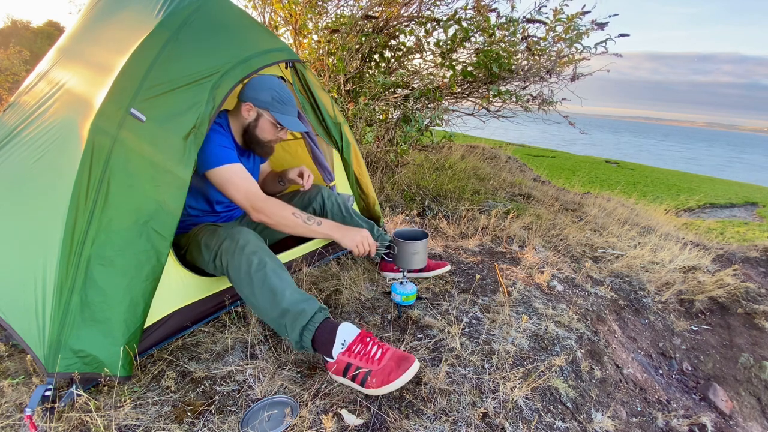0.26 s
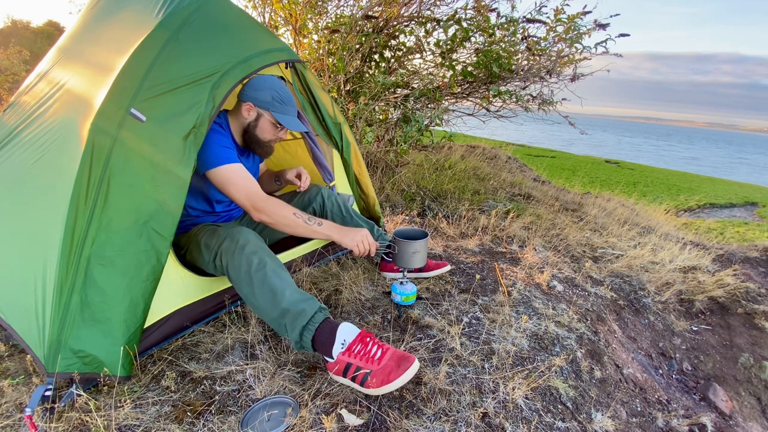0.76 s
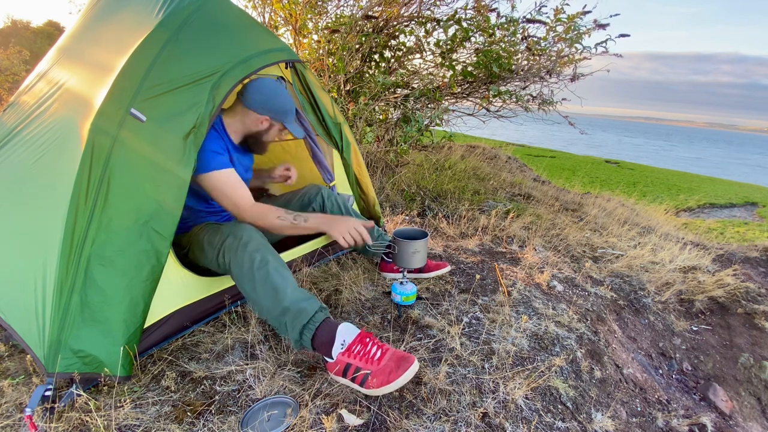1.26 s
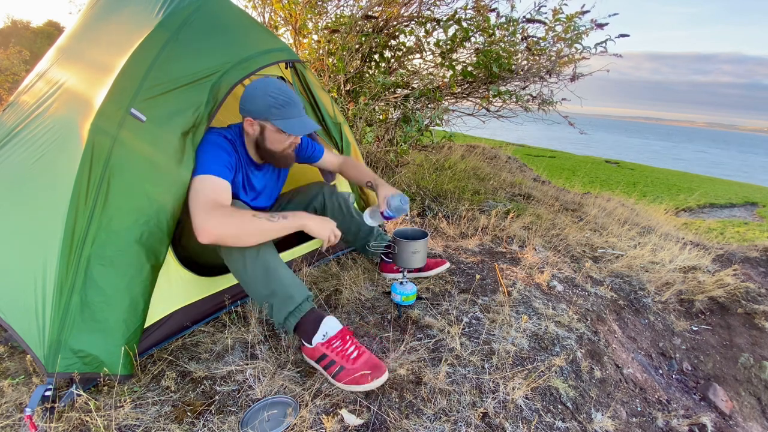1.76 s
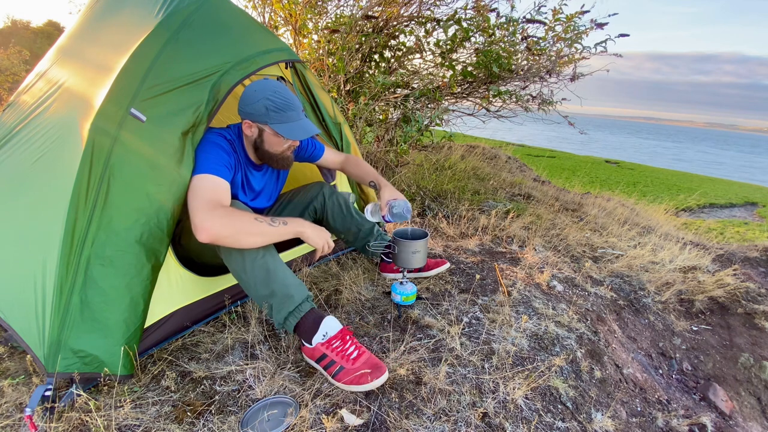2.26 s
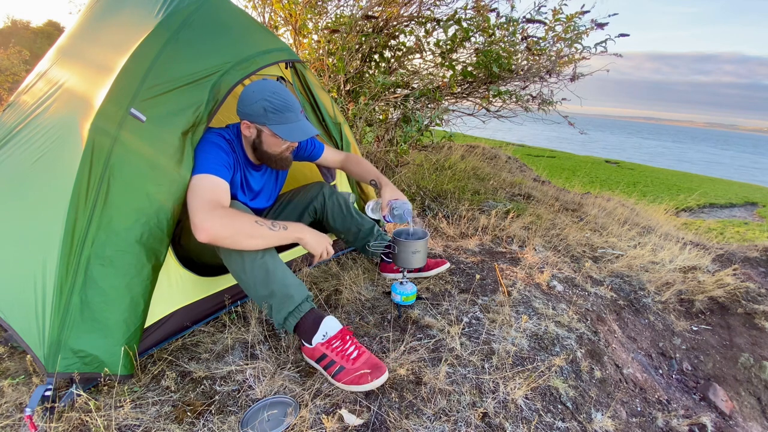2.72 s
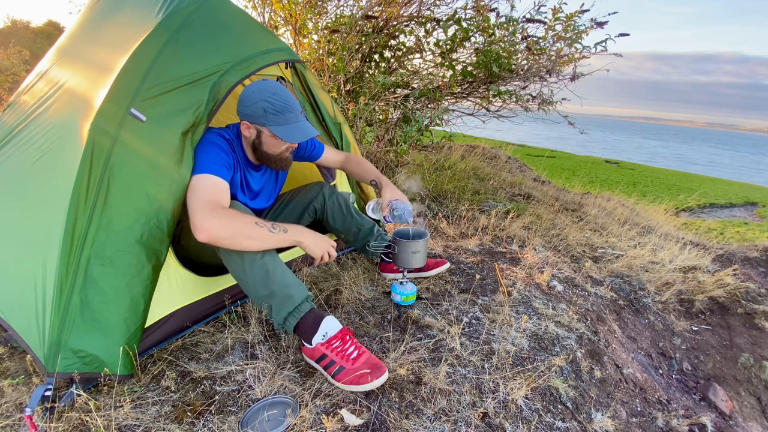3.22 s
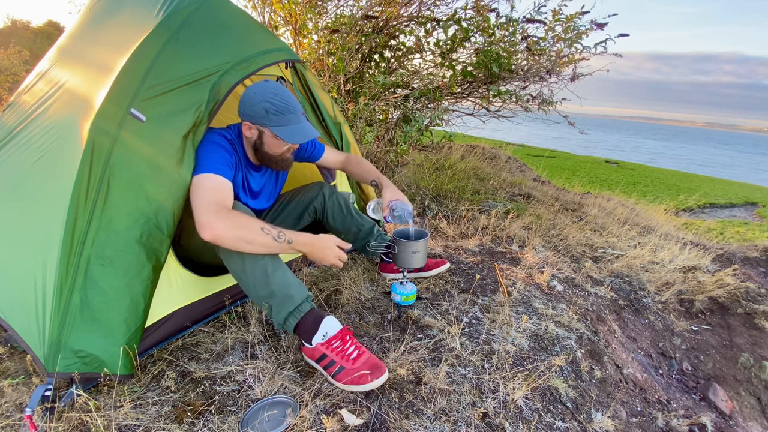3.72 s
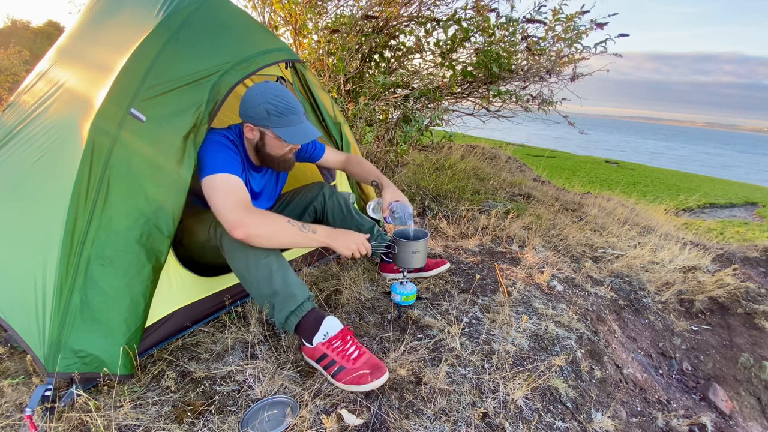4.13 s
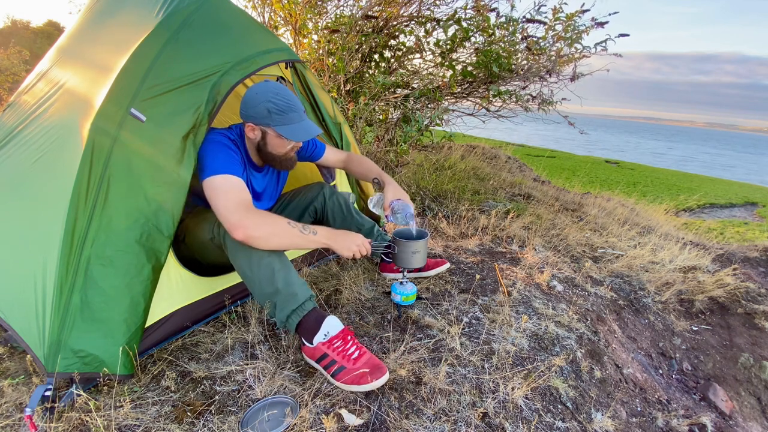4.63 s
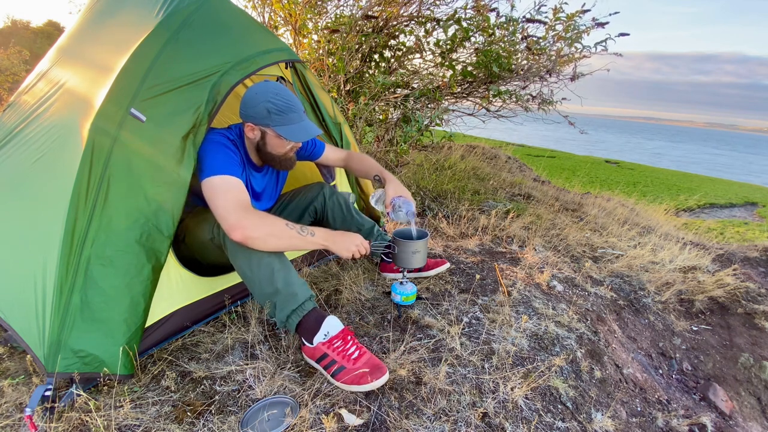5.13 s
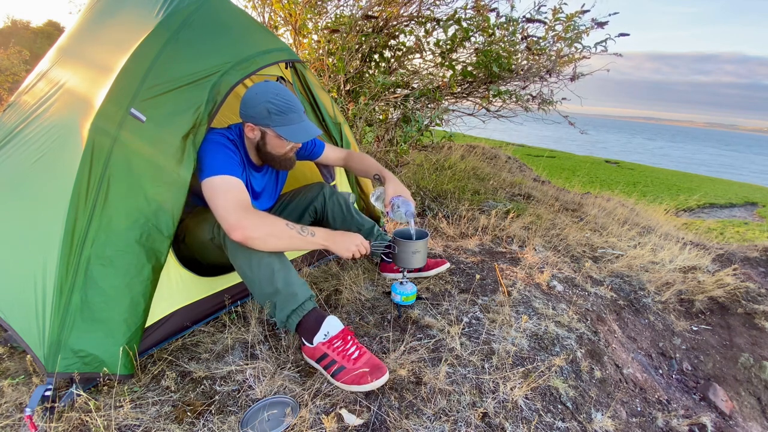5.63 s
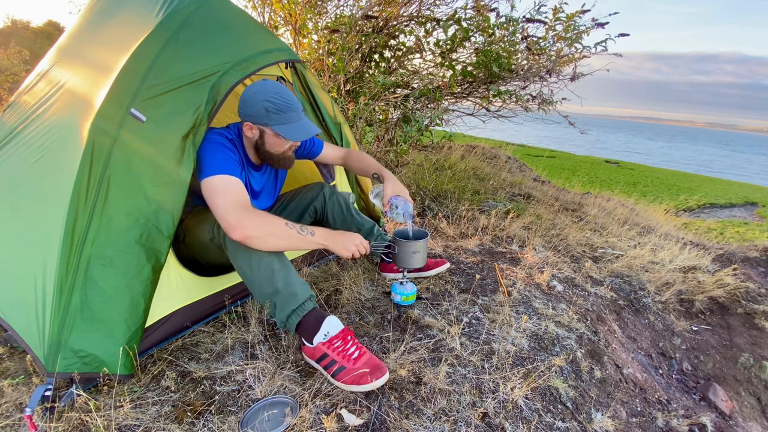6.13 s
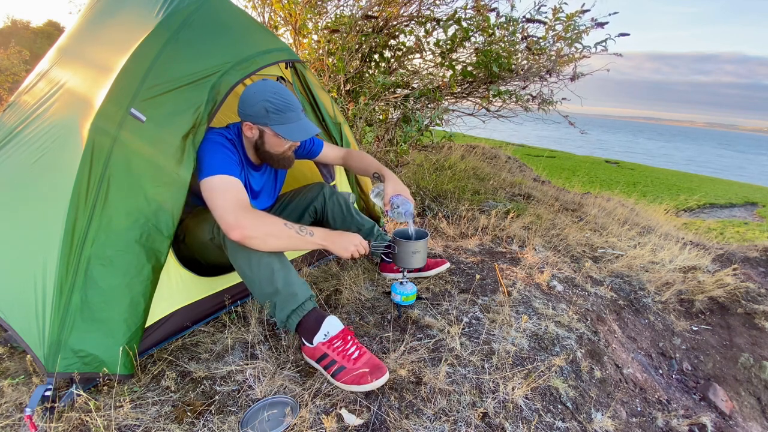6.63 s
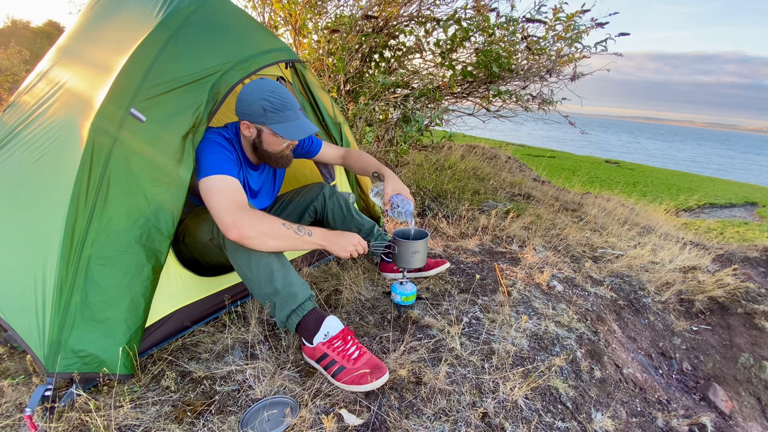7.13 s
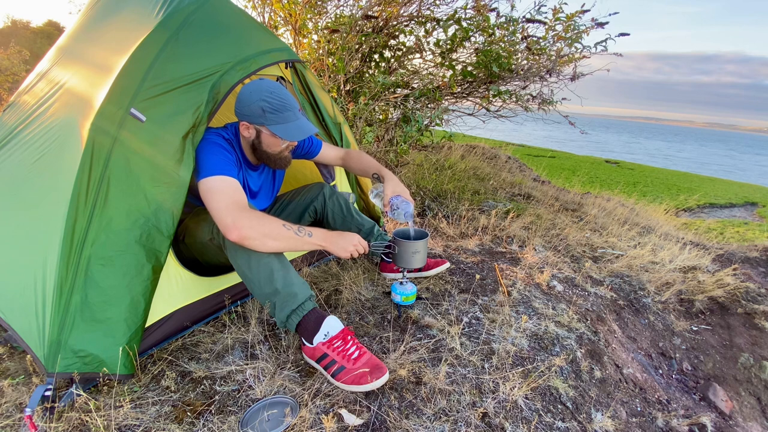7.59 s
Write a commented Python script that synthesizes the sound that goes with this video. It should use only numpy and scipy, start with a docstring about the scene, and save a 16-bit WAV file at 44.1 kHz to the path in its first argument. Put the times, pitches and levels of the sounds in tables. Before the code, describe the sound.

Outdoors, close and dry in mono, a camping stove burns throughout with a quiet low roar and thin hiss. From 0 to 0.9 seconds a thin metal pot is knocked and scraped on its supports: two brighter clinks at about 0.1 and 0.25, then gritty rasps and lighter taps. From 0.9 to 1.8 only the burner and a very faint rustle of cloth and dry grass remain, with a small brush near 1.4. At 1.8 water strikes the hot bottom: a sharp, surging, crackling sizzle with hollow booms, fading by 2.7. Then a thin stream pours until the end at about 7.9, in quick small slugs several times a second, with gurgles, tiny bubbles, metallic plinks and crisp drops. From 6.6 the drops grow louder, hollow gulps return around 7.4 to 7.8, and the pot's air note climbs. A barely audible thin whistle passes near 6.4; a faint low tone swells after 7.2.

```python
"""Outdoors, over the soft roar and thin hiss of a camping stove (shaped noise), a thin metal pot is tapped
and scraped into place (noise in wall modes); then cloth and dry grass rustle. A bottle glugs water in:
the first sizzles on the hot bottom (crackle in the wetted wall) and booms in the pot's air (damped sines),
the rest splashes in slugs, pops bubbles and drops while the air note climbs (pings, noise, glides).
Late on, a faint thin whistle passes and a low tone swells (sines)."""
import sys
import numpy as np
from scipy import signal
from scipy.fft import rfft, irfft, next_fast_len
from scipy.io import wavfile
from scipy.ndimage import uniform_filter1d, map_coordinates

SR = 44100
rng = np.random.default_rng(int(sys.argv[2]) if len(sys.argv) > 2 else 0)


def digitize_waveform(pressure):
    """Quantize a signal to 16-bit integers and store it at the path in sys.argv[1].

    Rows of a 2-D input are taken as channels; values are limited to [-1, 1].
    """
    field = np.atleast_2d(pressure).T
    bounded = np.clip(field, -1, 1)
    quanta = np.round(bounded * 32767).astype(np.int16)
    wavfile.write(sys.argv[1], SR, quanta)


N = 346626
T = np.arange(N) / SR
TOP_HZ = 15780  # band limit

# "rel. level" is a balance that the playing function trims further

# burner roar over time: [t/s, rel. level/dB]
ROAR_LEVEL = [(0.0, -38.5), (0.35, -38.5), (1.66, -41.5), (2.08, -33.5), (2.74, -39), (5.91, -40.5),
              (7.86, -35)]
# colour of the roar: [f/Hz, rel. level/dB]
ROAR_COLOUR = [(53, -65.5), (90, -22), (162, -7.5), (342, -3.5), (465, -3.5), (1030, -2.5), (1360, -14),
               (1480, -23.5), (3000, -33), (4200, -80)]
# colour of the burner hiss: [f/Hz, rel. level/dB]
HISS_COLOUR = [(880, -9.5), (1500, 2), (2930, -8.5), (13100, -24), (15800, -19)]

# pot dragged over the supports, stroke by stroke: [start t/s, length t/s, rel. level/dB]
STROKES = [(0, 0.041, -43.5), (.081, 0.033, -31), (.11, .11, -45), (.256, 0.039, -26.5),
           (.325, 0.059, -27.5), (.41, 0.069, -24), (.52, 0.068, -45), (.582, 0.083, -29),
           (.705, 0.023, -42.5), (.79, 0.046, -50.5), (.905, 0.003, -38)]
# pot knocked on the supports: [t/s, rel. level/dB]
TAPS = [(0.0797, -8), (0.2534, -5), (0.412, -19), (0.5435, -20), (0.59, -29), (0.712, -19), (0.904, -20.5)]
# colour of the scrape heard directly: [f/Hz, rel. level/dB]
RASP_COLOUR = [(700, -19.5), (1300, -1), (2100, -11), (5200, -15), (9000, -7.5), (10500, -19), (13000, -9),
               (15800, -28)]
# dry pot wall modes: [f/Hz, width f/Hz]
DRY_WALL = [(1615, 5), (1717, 12), (1818, 20), (2351, 13), (2800, 70), (2914, 26), (3170, 40), (3591, 15),
            (3900, 12), (4089, 14), (4273, 18), (4465, 60), (4600, 130), (4930, 13), (5530, 60),
            (5940, 160), (7100, 25), (8230, 70), (8700, 25)]
# strength of each dry mode: [first seating rel. level/dB, reseated rel. level/dB]
SEATING = [(-10, 1), (2, -2), (-5, 4.5), (-7.5, 1.5), (-9.5, -4), (-0.5, 3.5), (-22, -17), (3, 3),
           (-16, -7), (-8, -8), (-7, -1.5), (-12, -8), (-12.5, -8), (-8, -28), (-9.5, -7.5), (-15, -10),
           (-11, -6), (-13, -10), (-14, -9)]
# which way each dry mode swings at the microphone; like neighbours leave a dark gap between them
SWING = "+-++-++---+-+++-+-+"
GRIP_DB_S, SLIP_DB_S = 2500, 547  # a stroke swells and dies this fast
DRY_NOTE_DB, DRY_NOTE_FALL_DB_S = -1.5, 266  # the air note under a stroke lingers
RESEAT_S = .405  # the pot drops into another seating, and other modes ring

# air note of the pot: [t/s, centre f/Hz]
AIR_NOTE = [(0, 600), (.2, 597), (.25, 720.3), (1.7, 703.5), (2.05, 621.7), (2.4, 650.7), (3, 660),
            (4, 650), (7.86, 821)]
AIR_NOTE_WANDER_HZ = 24.86  # scale of the wander: the churning surface moves the note about

# cloth and dry grass brushed by an arm: [start t/s, length t/s, level/dB]
RUSTLE = [(.9, 1, -63.5), (1.38, 0.07, -51)]
BRUSH_DB_S = 159  # a brush swells and dies this fast

# water boiling off the hot bottom as it cools: [t/s, rel. level/dB]
SIZZLE = [(1.797, -82), (1.81, -22), (2.0, -22), (2.24, -27.5), (2.33, -24.5), (2.4, -31.5), (2.46, -23),
          (2.57, -31), (2.68, -41), (2.75, -47)]
# fresh water landing on the hot bottom: [t/s, width t/s, lift level/dB, finest spray further rel. level/dB]
SURGES = [(1.829, 0.016, 3, 4.5), (1.975, 0.029, 1.5, 10), (2.145, 0.032, 5.5, 2), (2.284, 0.025, 3, 8),
          (2.497, 0.018, 5, 7)]
# wetted wall modes: [f/Hz, width f/Hz, bare bottom rel. level/dB, covered bottom rel. level/dB]
WET_WALL = [(1912, 32, -1, 5.5), (3057, 25, 2.5, 2), (3820, 68, -6, -6), (4170, 67, 0.5, -2),
            (5250, 49, 0.5, -19), (5720, 45, 6, -13), (5760, 56, -12, -1), (6590, 66, 1, 1),
            (8000, 100, 1.5, 3.5), (8140, 170, 6.5, 5.5), (12360, 60, 0, -6), (12900, 100, 1, -15)]
# colour of the steam heard directly: [f/Hz, rel. level/dB]
STEAM_COLOUR = [(700, -25), (1200, -15.5), (3000, -9.5), (6000, -8.5), (8100, -2), (10800, -12),
                (13300, -2), (15800, -16)]
MIST_DB = 0.5  # finest spray over the body of the boil, before surges and cooling
COOL_DB, MIST_DULLS = -27.5, 1  # below this base level the spray loses this many dB more per dB
WET_NOTE_DB = -11.5  # air note under the boil
COVERED_S, COVERING_S = 2.28, 0.092  # when the water closes over the bottom, and how gradually

# slugs of water that boom in the pot: [t/s, rel. level/dB, base f/Hz]
BOOMS = [(1.826, -26.5, 677), (2.161, -19.5, 654), (2.189, -21.5, 624), (2.326, -26.5, 640),
         (3.611, -31.5, 683), (3.816, -26.5, 621), (3.838, -31.5, 674), (6.744, -34, 780),
         (7.403, -23, 830), (7.55, -21.5, 790), (7.674, -34, 593), (7.701, -34, 818), (7.805, -29.5, 805),
         (7.853, -37, 750)]
BOOM_T60_S = 0.061  # each partial stretches or shortens this

# modes of the pot with water in it: [f/Hz, width f/Hz, level/dB]
FILLED_POT = [(1962, 54, -10.5), (2834, 78, -26), (3660, 61, -3.5), (3990, 70, -16), (5620, 1440, -10),
              (8150, 1130, -3), (12280, 980, -5)]
# tiny droplets snapping on the wall, short and wide: [t/s, rel. level/dB]
SNAPS = [(2.6963, -27), (2.7135, -22), (2.721, -24), (2.786, -33), (4.2624, -28), (5.785, -28),
         (5.9539, -28), (6.0458, -23.5), (6.3351, -24), (6.345, -21), (6.3669, -36), (6.388, -26),
         (6.4078, -27), (6.595, -20.5), (6.6056, -18), (6.6194, -29)]
SNAP_T60_S = 0.015

# slugs of water from the bottle: [start t/s, length t/s, rel. level/dB, finest spray above it level/dB]
GLUGS = [(2.699, 0.024, -40, 0), (2.792, 0.053, -58, 9.5), (2.917, 0.076, -48.5, 5.5),
         (3.1, 0.065, -44.5, 3.5), (3.248, 0.0077, -41, 6), (3.373, 0.1, -42.5, 1),
         (3.574, 0.095, -41.5, 3), (3.739, 0.12, -40.5, 2), (3.973, 0.16, -43.5, 3),
         (4.2, 0.1, -39.5, -0.5), (4.356, 0.046, -42.5, -4), (4.457, 0.048, -43.5, 4.5),
         (4.547, 0.18, -45, 0.5), (4.736, 0.091, -42, -11), (4.918, 0.049, -41.5, -0.5),
         (5.025, 0.019, -43.5, 4), (5.192, 0.093, -42.5, 0), (5.331, 0.093, -41.5, -1),
         (5.456, 0.037, -40.5, 0), (5.573, 0.049, -42, -1), (5.81, 0.067, -42.5, 0),
         (5.938, 0.023, -39.5, -6), (6.063, 0.031, -50, 4), (6.2, 0.034, -37, -6.5),
         (6.326, 0.034, -40.5, -7), (6.463, 0.044, -40, -1), (6.584, 0.05, -38, -5),
         (6.71, 0.074, -37, -11), (6.86, 0.023, -38.5, 4), (7, 0.038, -36, -0.5),
         (7.136, 0.049, -40.5, 1.5), (7.276, 0.046, -37, -2.5), (7.397, .04, -46, -2),
         (7.517, 0.054, -41, -11), (7.637, 0.081, -44, -4), (7.8, .04, -42.5, -6)]
LAND_DB_S, DRAIN_DB_S = 533, 402  # a slug swells and dies this fast
# stream between slugs: [t/s, trickle rel. level/dB, finest spray above it level/dB]
TRICKLE = [(2.7, -53, -6), (3.5, -60, 2), (3.9, -51.5, -2), (4.4, -53.5, 6), (5.1, -50, 4.5),
           (5.6, -47.5, -0.5), (6.1, -49, -5), (6.8, -45, -2.5), (7.86, -47.5, -1.5)]
STREAM_S = TRICKLE[0][0]
# low notes kept gurgling by the stream: [f/Hz, width f/Hz, over the stream rel. level/dB]
GURGLE = [(1905, 100, -11), (2932, 260, -13.5), (3960, 200, -12.5)]
GURGLE_LUMPY_DB = 3  # each note comes and goes by itself
DEEP_S, SHALLOW_DB_S = 4.07, 8.5  # deep enough to gurgle fully; before, weaker by this many dB per second
SIMMER_DB, SIMMER_SINKS_DB_S = -43.5, 4.5  # air note as the stream begins, and how fast it settles
# droplets on the wall: rel. level over the stream, spread of sizes, decay
TICK_DB, TICK_SCATTER_DB, TICK_T60_S = 8.5, 6.5, 0.0036
# locked-on bubbles: rel. level over the stream, spread of sizes, decay, spread of pitch as a share
PLINK_DB, PLINK_SCATTER_DB, PLINK_T60_S, PLINK_SPREAD = -7, 2.5, 0.026, 0.113

# single large bubbles: [t/s, rel. level/dB, start f/Hz, end f/Hz, length t/s]
BUBBLES = [(2.727, -27.5, 1720, 1780, 0.007), (3.859, -32, 1350, 2370, 0.029), (6.88, -23, 786, 1090, 0.02),
           (6.896, -41, 1260, 1960, 0.04), (7.133, -24, 3750, 3970, 0.0085),
           (7.275, -22.5, 744, 850, 0.045), (7.421, -18.5, 687, 944, 0.018),
           (7.555, -31.5, 302, 350, 0.019), (7.802, -23.5, 1260, 1570, 0.0071)]
BUBBLE_FADE_DB = 5  # lost over its length
# loud drops bursting on the surface: [t/s, rel. level/dB, start f/Hz]
DROPS = [(2.961, -25, 11400), (3.198, -25.5, 8850), (3.2482, -25, 5150), (3.27, -28.5, 3520),
         (3.3598, -29, 7600), (3.411, -25, 7900), (3.383, -25, 7200), (3.575, -20, 7830),
         (3.7648, -24.5, 8200), (3.7927, -24, 9400), (4.013, -27, 4550), (4.0754, -21, 6350),
         (4.3536, -27.5, 8300), (4.3726, -29, 2800), (4.4936, -25, 6100), (4.622, -26, 4050),
         (4.766, -27, 2820), (4.939, -29, 2880), (5.03, -31, 3930), (5.2122, -25.5, 8800),
         (5.3622, -24.5, 4050), (5.49, -21, 8220), (5.6069, -19.5, 8500), (6.08, -24.5, 3900),
         (6.1537, -31, 4000), (6.21, -19, 4100), (6.473, -23.5, 3600), (6.579, -26, 4620),
         (6.6372, -23, 13000), (6.7451, -11.5, 13400), (6.881, -26.5, 5950), (6.9926, -28, 7430),
         (7.022, -17, 8600), (7.1498, -15.5, 5580), (7.2795, -22.5, 3560), (7.4038, -21, 4100),
         (7.4128, -11, 5170), (7.5498, -25.5, 5200), (7.6037, -29.5, 5100), (7.6293, -27.5, 4900),
         (7.6725, -23.5, 8900), (7.812, -18, 5350)]
# clear bubbles plinking in the pot: [t/s, level/dB, start f/Hz]
PLINKS = [(3.380, -36, 3700), (3.672, -35, 1930), (4.072, -36, 1680), (4.110, -34, 1860),
          (4.143, -37, 2900), (4.325, -34.5, 1915), (4.390, -30, 2870), (4.534, -33, 2950),
          (4.576, -29, 2910), (4.688, -36, 1880), (4.711, -34, 4300), (4.908, -30.5, 2690),
          (4.955, -34, 1890), (5.348, -31, 1820), (5.463, -30, 3940), (5.928, -30.5, 3620),
          (6.307, -33, 2710), (6.707, -36, 1895), (6.714, -27, 4000), (6.951, -30, 2240),
          (7.148, -25, 3530), (7.172, -32.5, 1915), (7.217, -29, 3660), (7.277, -28, 1350),
          (7.401, -25.5, 1400), (7.455, -32.5, 2670), (7.526, -36.5, 2025)]
PLINK_CYCLES, PLINK_RISE = 85, 0.035  # to die by 60 dB; pitch climbs by this share

# a thin brief whistle, then a low tone that swells near the end; each: [t/s, f/Hz, level/dB]
FAINT_TONES = ([(6.345, 2900, -57), (6.445, 2870, -54)], [(7.2, 491, -51), (7.6, 474, -47),
               (7.86, 485, -42)])


def amp(db):
    """Gain of a level in dB."""
    return 10 ** (np.asarray(db) / 20)


def unit(x):
    """Scaled to rms 1."""
    return x / np.sqrt(np.mean(x ** 2) + 1e-20)


def curves(rows):
    """One value per sample for each column after the time, and a gate that is open between the ends."""
    s, *cols = np.transpose(rows)
    gate = (T >= s[0]) & (T <= s[-1])
    return [np.interp(T, s, c) for c in cols] + [gate]


def bursts(rows, rise, fall):
    """Level in dB of events that swell, hold and die, their powers added."""
    t = T[::32]
    power = 1e-14
    for s, length, db in rows:
        event_db = db - rise * np.maximum(s - t, 0) - fall * np.maximum(t - s - length, 0)
        power = power + amp(2 * event_db)
    return np.interp(T, t, 10 * np.log10(power))


def wobble(rate):
    """A smooth random curve, rate knots a second."""
    return map_coordinates(rng.standard_normal(int(N * rate / SR) + 4), [T * rate])


def drift(x, depth_s, rate):
    """Read with a slowly wandering delay, so that all its resonances slide a little."""
    return map_coordinates(x, [np.arange(N) + depth_s * SR * wobble(rate)], mode="nearest")


def filtered(x, response):
    """x times a complex response of frequency."""
    m = next_fast_len(N + SR // 2)
    return irfft(rfft(x, m) * response(np.fft.rfftfreq(m, 1 / SR)), m)[:N]


def shape(points):
    """Response through (f/Hz, level/dB) points on a log axis."""
    f, db = np.transpose(points)
    return lambda hz: amp(np.interp(np.log(hz + 1), np.log(f), db))


def modes(rows, swing="+-" * 20):
    """Causal response of a set of resonances, each swinging the way its sign says."""
    def response(f):
        total = 0
        for way, (centre, width, db) in zip(swing, rows):
            damping = 1j * f * width
            total = total + int(way + "1") * amp(db) * damping / (centre * centre - f * f + damping)
        return total
    return response


def pot(f):
    """What the part-filled pot does to sounds made inside it: a broad band plus its modes."""
    band = amp(-7.0) / (1 + (1100 / (f + 1)) ** 6) / (1 + (f / 10000) ** 4)
    return band + modes(FILLED_POT, "+" * len(FILLED_POT))(f)


def grit(lumpy_db, rate):
    """Noise whose level jumps about at the given rate."""
    return unit(amp(lumpy_db * wobble(rate)) * rng.standard_normal(N))


def patches(deep_db, bins, frames):
    """Noise with spots of random gain in time and frequency."""
    z = signal.stft(rng.standard_normal(N), nperseg=128)[2]
    field = uniform_filter1d(rng.standard_normal(z.shape), size=bins, axis=0)
    field = uniform_filter1d(field, size=frames, axis=1)
    return unit(signal.istft(z * amp(deep_db * unit(field)), nperseg=128)[1][:N])


def hollow(width_hz, lumpy_db):
    """Noise in the air resonance of the pot: slow noise pairs carried on its moving note."""
    lowpass = lambda f: 1 / (1 + 2j * f / width_hz) ** 2
    slow_cos, slow_sin = [filtered(grit(lumpy_db, 39.91), lowpass) for _ in "xy"]
    hz = np.interp(T, *np.transpose(AIR_NOTE)) + AIR_NOTE_WANDER_HZ * wobble(12)
    phase = 2 * np.pi * np.cumsum(hz) / SR
    return unit(slow_cos * np.cos(phase) + slow_sin * np.sin(phase))


def pings(s, gain, hz, t60, rise, size):
    """Damped sines whose pitch climbs by a share over their life, summed at their times."""
    t = np.arange(size) / SR
    life = t / t60[:, None]
    soft_start = 1 - np.exp(-t * hz[:, None])  # over about the first cycle
    swell = soft_start * amp(-60 * life) * gain[:, None]
    wave = swell * np.sin(2 * np.pi * hz[:, None] * t * (1 + rise * life / 2))
    at = np.round(s * SR).astype(int)[:, None] + np.arange(size)
    return np.bincount(at.ravel(), wave.ravel(), N + size + SR)[:N]


def add_at(out, s, wave):
    """Mix a short wave into out at s seconds."""
    out[round(s * SR):][:len(wave)] += wave


def burner():
    """Turbulent flame: a slowly wavering roar under a thin, nearly steady hiss."""
    roar_db, _ = curves(ROAR_LEVEL)
    roar = unit(filtered(rng.standard_normal(N), shape(ROAR_COLOUR)))
    hiss = unit(filtered(grit(1.0, 19), shape(HISS_COLOUR)))
    return amp(roar_db - 5.5 + 1.4 * wobble(5.6)) * roar + amp(-53.5) * hiss


def handling():
    """Stick-slip grit and knocks drive the wall modes, unevenly as the contact moves; part is heard as rasp."""
    stroke_db = bursts(STROKES, GRIP_DB_S, SLIP_DB_S)
    drive = patches(3.7, bins=2, frames=16) * amp(1.5 * wobble(250) + stroke_db)
    t = np.arange(400) / SR
    for s, db in TAPS:
        add_at(drive, s, amp(db - 5.5 - 60 * t / 0.011) * rng.standard_normal(len(t)))

    first, second = (modes(np.column_stack([DRY_WALL, db]), SWING) for db in np.transpose(SEATING))
    ring = filtered(drive * (T < RESEAT_S), first) + filtered(drive * (T >= RESEAT_S), second)
    ring = amp(16.5) * drift(ring, .00005, rate=25)
    rasp = amp(3.5) * filtered(drive, shape(RASP_COLOUR))

    # an earlier knock dies away
    fading = sum(amp(db - 60 * T / 0.29) * np.sin(2 * np.pi * hz * T) for hz, db in [(3525, -36.5), (4270, -38.5)])
    fading = fading * amp(1.8 * wobble(60))
    note_db = DRY_NOTE_DB + bursts(STROKES, GRIP_DB_S, DRY_NOTE_FALL_DB_S)
    return ring + rasp + fading + amp(note_db) * hollow(width_hz=160, lumpy_db=0.5)


def rustle():
    """An arm brushes cloth and dry grass: lumpy shaped noise in soft bursts."""
    colour = shape([(800, -8), (2000, 1.0), (6000, -5.0), (15800, -11.0)])
    return amp(bursts(RUSTLE, BRUSH_DB_S, BRUSH_DB_S)) * unit(filtered(grit(1.8, 270), colour))


def sizzle():
    """Flash boiling: dense crackle, ringing in the wetted wall, with a fine spray on top."""
    base_db, on = curves(SIZZLE)
    surge_db, mist_db = sum(np.outer(lifts, np.exp(-((T - s) / width) ** 2)) for s, width, *lifts in SURGES)
    spray_db = MIST_DB + mist_db + MIST_DULLS * np.minimum(base_db - COOL_DB, 0)

    crackle = patches(1.9, bins=5, frames=16) * amp(base_db + surge_db + 0.69 * wobble(500)) * on
    fine = lambda f: 1 / (1 + (10700 / (f + 1)) ** 16)
    boil = filtered(crackle, lambda f: 1 - fine(f)) + filtered(crackle * amp(spray_db), fine)

    covered = (1 + np.tanh((T - COVERED_S) / COVERING_S)) / 2
    bare_wall, covered_wall = (modes(np.array(WET_WALL)[:, [0, 1, k]]) for k in (2, 3))
    ring = filtered(boil * np.sqrt(1 - covered), bare_wall) + filtered(boil * np.sqrt(covered), covered_wall)
    steam = filtered(boil, shape(STEAM_COLOUR))
    note = amp(base_db + WET_NOTE_DB) * on * hollow(width_hz=182, lumpy_db=1.0)
    return drift(amp(7.5) * steam + amp(8.5) * ring, 0.00063, rate=10) + note


def booms():
    """Slugs ring the air of the pot: close notes beat, with a thud below and an overtone above."""
    s, db, hz = np.transpose(BOOMS)
    out = np.zeros(N)
    # pitch ratio, share dB, stretch of the decay
    for ratio, share_db, stretch in (.98, 8.0, 1.28), (1.2, 1.0, 0.88), (0.425, -11.0, 0.25), (1.287, -4.0, 0.7):
        t60 = np.full(len(s), stretch * BOOM_T60_S)
        out += pings(s, amp(db + share_db), hz * ratio, t60, rise=0.13, size=6000)
    return out


def snaps():
    """Tiny droplets hit the wall: bright decaying noise (differenced), heard through the pot."""
    out, t = np.zeros(N), np.arange(1300) / SR
    for s, db in SNAPS:
        bright = np.diff(rng.standard_normal(len(t) + 1))
        add_at(out, s, amp(db - 15.5 - 60 * t / SNAP_T60_S) * bright)
    return amp(12.0) * filtered(out, pot)


def swarms(level_db, spray_db, count=560, size=6):
    """Small bubbles ring in clusters of neighbouring pitch, as strong as the stream at that moment."""
    when, centre, strength = rng.random((count, 3)).T[:, :, None]
    late, spread, life = rng.random((count, size, 3)).transpose(2, 0, 1)
    s = np.minimum(STREAM_S + when * (T[-1] - STREAM_S) + .025 * late, T[-1]).ravel()
    hz = np.minimum(1300 * (14000 / 1300) ** centre * (0.795 + 0.407 * spread), 15500).ravel()
    at = (s * SR).astype(int)
    # a few swarms are much louder; each starts strong
    loud_db = (-3 * np.log(strength + .02) - 10 * late).ravel()
    db = level_db[at] + spray_db[at] * (hz > 7000) + loud_db
    t60 = np.minimum((25 + 90 * life.ravel() ** 2) / hz, .025)
    return amp(6.5) * pings(s, amp(db), hz, t60, rise=0.06, size=750)


def ticks(level_db, count=300, size=500):
    """Single droplets strike the wall: short cracks, each with its own colour, following the stream's level."""
    when, tone, big = rng.random((count, 3)).T
    at = ((STREAM_S + when * (T[-1] - STREAM_S)) * SR).astype(int)
    t = np.arange(size) / SR
    carrier = np.cos(2 * np.pi * (2500 + 11000 * tone[:, None] ** 1.36) * t)
    crack = uniform_filter1d(rng.standard_normal((count, size)), size=9, axis=1) * carrier
    db = level_db[at] + TICK_DB - TICK_SCATTER_DB * np.log(big + 0.03)
    wave = amp(db[:, None] - 60 * t / TICK_T60_S) * crack
    return np.bincount((at[:, None] + np.arange(size)).ravel(), wave.ravel(), N + size)[:N]


def locked_plinks(level_db, count=420):
    """Bubbles that lock on to one of the low notes of the pot ring longer."""
    when, which, off, big = rng.random((count, 4)).T
    s = STREAM_S + when * (T[-1] - STREAM_S)
    note_hz = np.array(FILLED_POT)[(4 * which ** 1.4).astype(int), 0]
    hz = note_hz * (1 + PLINK_SPREAD * (2 * off - 1))
    db = level_db[(s * SR).astype(int)] + PLINK_DB - PLINK_SCATTER_DB * np.log(big + 0.031)
    return pings(s, amp(db), hz, np.full(count, PLINK_T60_S), rise=0.064, size=1400)


def gurgle(level_db):
    """The stream keeps each low note of the pot sounding in soft, uneven swells."""
    notes = np.zeros(N)
    for hz, width, db in GURGLE:
        note = unit(filtered(grit(5.3, 150), lambda f: modes([(hz, width, 0)])(f) ** 2))
        notes += amp(db + GURGLE_LUMPY_DB * wobble(22)) * note
    return amp(level_db) * drift(notes, 0.00073, rate=20)


def stream():
    """Bubbles, droplets and a spotty wash of noise swell with each glug and ring in the pot."""
    trickle_db, bright_db, on = curves(TRICKLE)
    level_db = np.maximum(trickle_db, bursts([row[:3] for row in GLUGS], LAND_DB_S, DRAIN_DB_S))
    misty = [(s, length, db + above) for s, length, db, above in GLUGS]
    # finest spray relative to the stream
    spray_db = np.maximum(trickle_db + bright_db, bursts(misty, LAND_DB_S, DRAIN_DB_S)) - level_db
    deep_db = level_db - SHALLOW_DB_S * np.maximum(DEEP_S - T, 0)

    fine = lambda f: 1 / (1 + (7000 / (f + 1)) ** 8)
    wash = unit(filtered(patches(5.5, bins=3, frames=9), lambda f: pot(f) * (1 - fine(f))))
    spray = unit(filtered(patches(6, bins=14, frames=3), lambda f: pot(f) * fine(f))) * amp(spray_db)
    slosh = amp(3.5) * hollow(width_hz=340, lumpy_db=4.5)
    # the air note never falls silent while the stream runs
    simmer = amp(SIMMER_DB - SIMMER_SINKS_DB_S * (T - STREAM_S)) * hollow(width_hz=270, lumpy_db=2.5)
    steady = on * (amp(level_db - 9) * (wash + spray + slosh) + simmer + gurgle(deep_db))
    struck = filtered(swarms(level_db, spray_db) + ticks(level_db), pot)
    return steady + struck + locked_plinks(deep_db)


def bubbles():
    """Single large bubbles: short sines gliding up in pitch, shaken by the churning water."""
    out, rough = np.zeros(N), wobble(400)
    for s, db, hz0, hz1, length in BUBBLES:
        u = np.arange(int(length * SR)) / (length * SR)
        glide = np.sin(2 * np.pi * length * (hz0 * u + (hz1 - hz0) * u ** 2 / 2))
        swell = amp(db - BUBBLE_FADE_DB * u) * np.sin(np.pi * u) ** .5
        add_at(out, s, swell * glide * (1 + 0.7 * rough[round(s * SR):][:len(u)]))
    return out


def drops(size=8):
    """Loud drops: a rising ping, with a noise crack and a scatter of droplets ringing in the pot."""
    s, db, hz = np.transpose(DROPS)
    main = pings(s, amp(db - 5.5), hz, 0.0095 + 70 / hz, rise=0.11, size=800)

    late, spread = rng.random((len(s), size, 2)).transpose(2, 0, 1)
    small_s = (s[:, None] + 0.017 * late ** 2).ravel()
    small_hz = np.minimum(hz[:, None] * 2 ** (1.68 * (spread - .4)), 15500).ravel()
    small_db = (db[:, None] - 10.5 - 10 * late).ravel()
    droplets = pings(small_s, amp(small_db), small_hz, 30 / small_hz, rise=0.088, size=700)

    crack, t = np.zeros(N), np.arange(1300) / SR
    for at, level_db in zip(s, db):
        add_at(crack, at, amp(level_db - 18.5 - 60 * t / 0.044) * rng.standard_normal(len(t)))
    return main + amp(12.0) * filtered(crack + droplets, pot)


def clear_plinks():
    """Clear bubbles ring as slightly rising sines that last a fixed number of cycles."""
    s, db, hz = np.transpose(PLINKS)
    return pings(s, amp(db), hz, PLINK_CYCLES / hz, PLINK_RISE, size=3000)


def faint_tones():
    """A thin brief whistle and a low swelling tone: sines along pitch and level curves."""
    out = np.zeros(N)
    for tone in FAINT_TONES:
        hz, level_db, on = curves(tone)
        out += amp(level_db + 0.7 * wobble(6.3)) * on * np.sin(2 * np.pi * np.cumsum(hz) / SR)
    return out


def scene():
    """All sources, at one microphone in the open."""
    before_water = burner() + handling() + rustle()
    water = sizzle() + booms() + snaps() + stream() + bubbles() + drops() + clear_plinks()
    return (before_water + water + faint_tones())[None]


def record(dry):
    """A wind filter cuts the bass and a band limit the top; very faint noise below 90 Hz is added afterwards."""
    wind_cut = lambda hz: 1 / (1 + (100 / (hz + 1)) ** 12)
    low_noise = amp(-88) * unit(filtered(rng.standard_normal(N), lambda hz: hz < 90))
    return (filtered(dry[0], lambda hz: wind_cut(hz) * (hz < TOP_HZ)) + low_noise)[None]


dry = scene()
out = record(dry)
digitize_waveform(out)
```